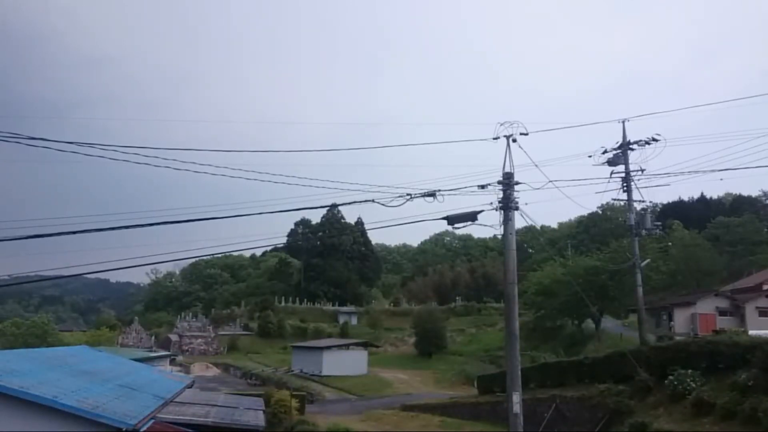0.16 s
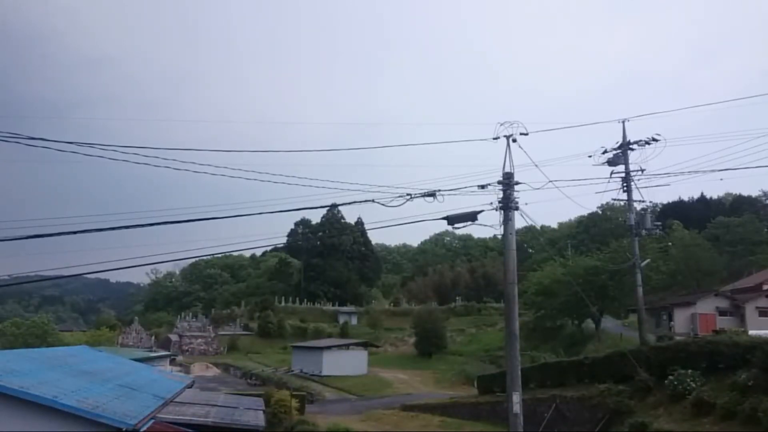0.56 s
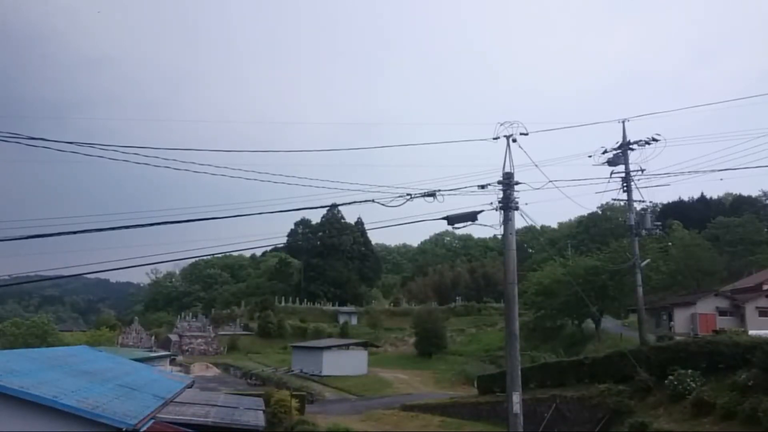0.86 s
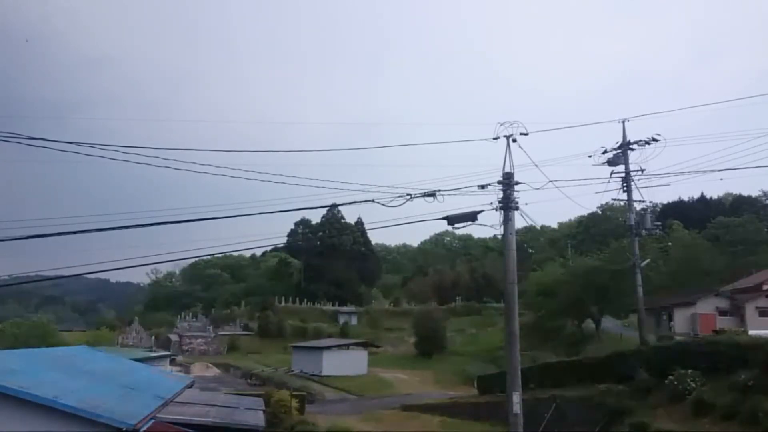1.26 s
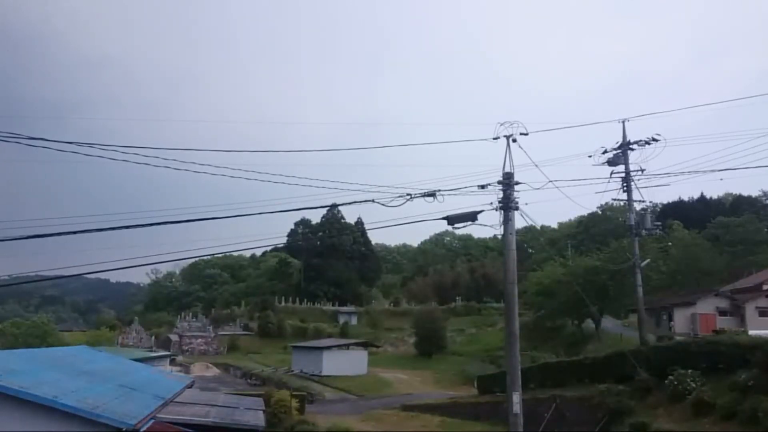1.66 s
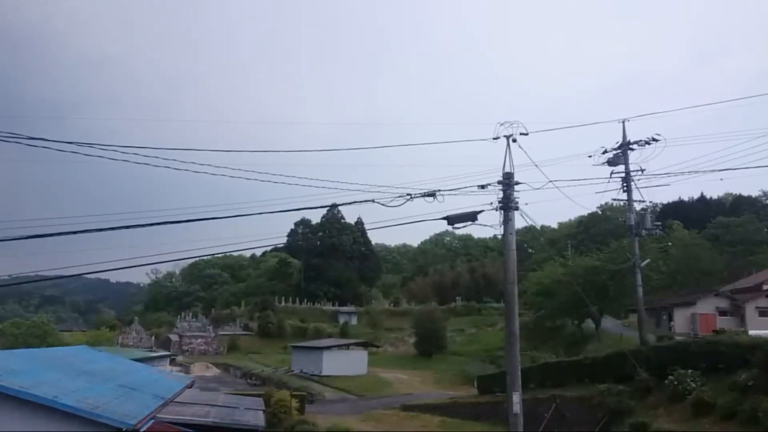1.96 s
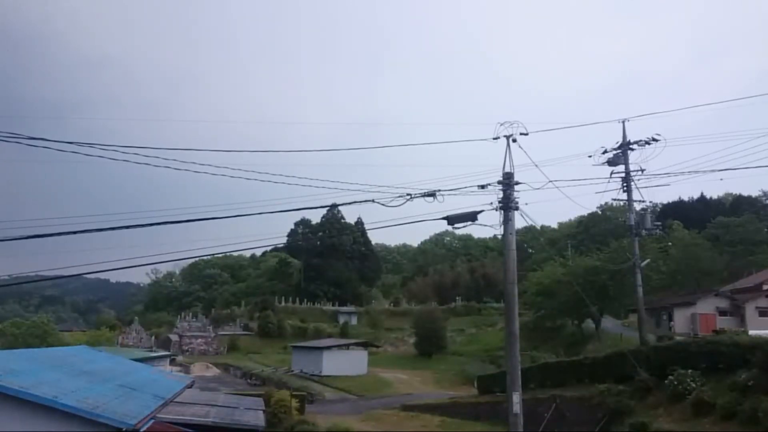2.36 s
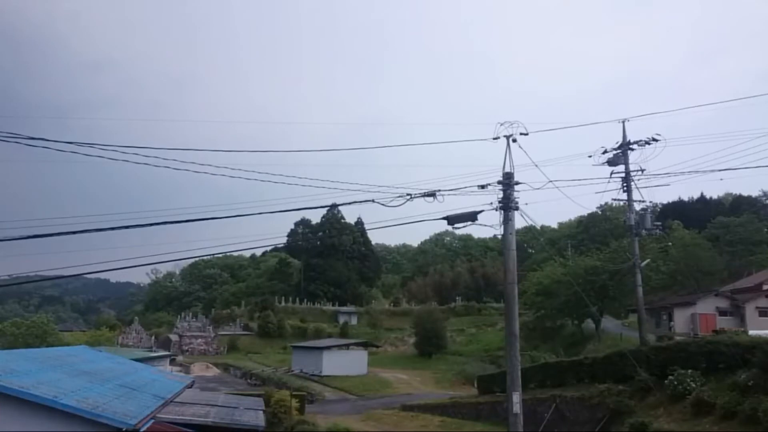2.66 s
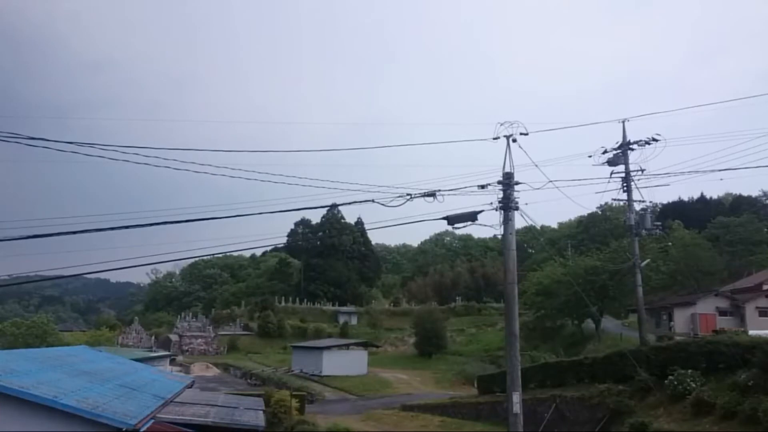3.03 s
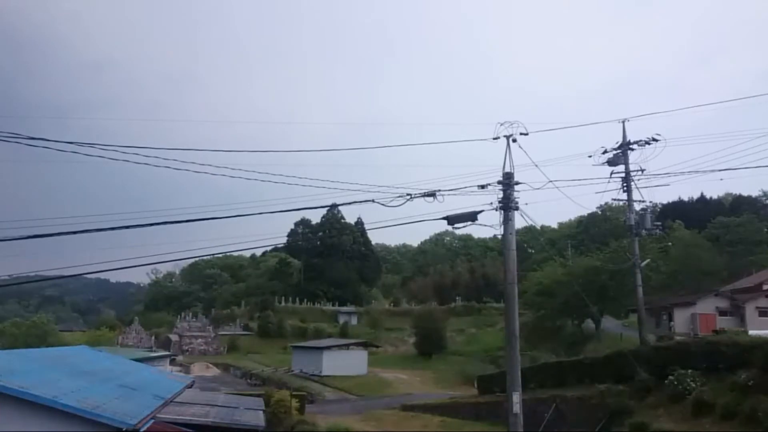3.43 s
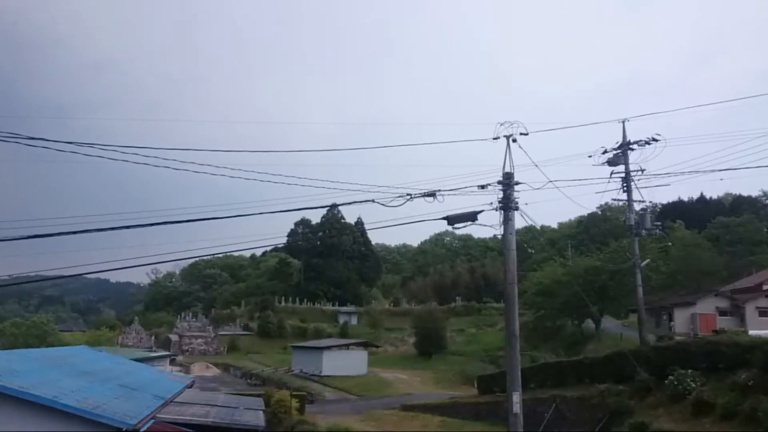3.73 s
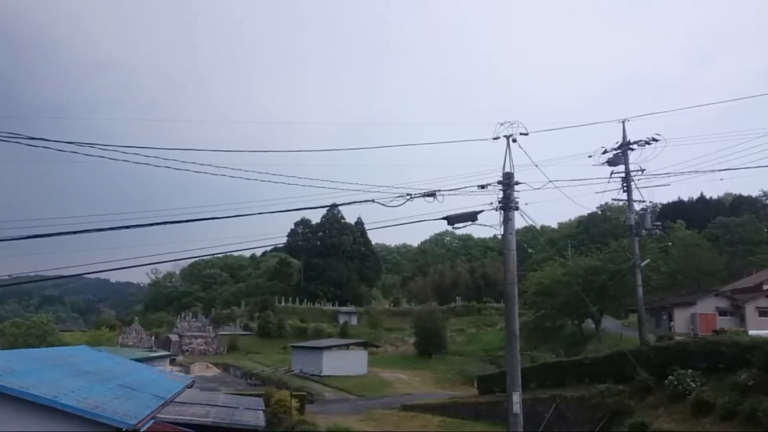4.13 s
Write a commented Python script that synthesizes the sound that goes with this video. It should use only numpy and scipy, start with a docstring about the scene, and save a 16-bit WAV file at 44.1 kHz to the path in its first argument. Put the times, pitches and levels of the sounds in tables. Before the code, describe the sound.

A loud clap of distant dry thunder rolls on in a low, uneven rumble over a quiet village, with faint knocks nearby.

```python
"""Dry thunder kilometres off, over a quiet village; one microphone stands just in front of a house wall.
Every kink of the lightning channel sends an N-shaped pressure wave: the big ones arrive as claps,
thousands of small ones as the roll, all dulled by the air, and the hills echo the claps.
Three loud claps carry a short overload click. Close to the microphone, something like a window screen
slides softly in its runner and knocks a few times. Behind it all lies the faint hush of country air."""
import sys
import numpy as np
from scipy import signal
from scipy.fft import rfft, irfft, next_fast_len
from scipy.io import wavfile
from scipy.ndimage import uniform_filter1d, minimum_filter1d

SR = 44100
rng = np.random.default_rng(int(sys.argv[2]) if len(sys.argv) > 2 else 0)


def bounce(signal):
    """Save signal as a 16-bit WAV file at the path given by the first command-line argument."""
    frames = np.transpose(np.atleast_2d(signal))
    limited = np.clip(frames, -1, 1)
    pcm = np.round(limited * 32767).astype(np.int16)
    wavfile.write(sys.argv[1], SR, pcm)


N = 189365
TIME = np.arange(N) / SR

# The big pressure waves. Each row: start in seconds, relative peak in dB, pitch of the wave in Hz,
# frequency in Hz above which the air has dulled it, seconds for which its surge holds.
CLAPS = [(0.359,0.5,197.5,627,0.019), (0.390,-3.5,442,602,0.0087), (0.457,-10,90.7,530,0.012),
         (0.473,-9.5,167,700,0.008), (0.517,-10,111,440,0.013), (0.540,-11.5,433,700,0.019),
         (0.678,-10.5,185,520,0.0061), (0.793,-10.5,170,637,0.0053), (0.819,-5.5,144,250,0.02),
         (0.851,-10.5,174,560,0.025), (0.931,-15,136,680,0.012), (0.982,-19.5,374,740,0.039),
         (1.078,-21,398,800,0.033), (1.323,-14,126,360,0.01), (1.351,-10.5,194,540,0.036),
         (1.46,-20.5,151,355,0.032), (1.531,-1.5,208,630,0.02), (1.6,-6.5,213,590,0.026),
         (1.647,-9.5,129,503,0.02), (1.745,-8,83.3,680,0.019), (1.817,-13,237,480,0.079),
         (1.899,-5.5,187,620,0.015), (1.925,-7.5,130,520,0.0063), (2.009,-5.5,91.4,620,0.0073),
         (2.068,-16,109,549,0.012), (2.11,-9.5,156,500,0.0063), (2.194,-13.5,195,330,0.005),
         (2.347,-6.5,91,150,0.034), (2.606,-20,262,450,0.01), (2.663,-14,104.3,400,0.034),
         (2.77,-17,175,320,0.03), (2.867,-11,79.7,380,0.011), (2.991,-15,134,436,0.013),
         (3.118,-8,85.4,400,0.034), (3.255,-16,264,630,0.014), (3.418,-23.5,101,230,0.01),
         (3.518,-26.5,80,220,0.0055), (3.777,-7.5,154,420,0.026), (3.807,-12.5,116,470,0.02),
         (3.845,-16,74,190,0.058), (3.907,-13,190,402,0.039), (3.924,-7.5,198,430,0.016),
         (3.981,-13.5,137,384,0.074), (4.059,-18.5,84,300,0.031)]
# The steady roll under the claps. Each row: time in seconds, level in dB.
ROLL_LEVEL = [(0.27, -47), (0.335, -24.5), (0.42, -21.5), (0.62, -30), (0.9, -31.5), (1.27, -31),
              (1.5, -28), (1.6, -21), (1.95, -15.5), (2.2, -24.5), (2.55, -29.5), (2.85, -28.5),
              (3.2, -25.5), (3.4, -40), (3.72, -41.5), (3.95, -25.5), (4.29, -43)]


def claps(gain_db=-0.5, scatter_db=-19, scatter_t60_s=0.25, size=8192):
    """Each far clap is one big N-wave, trailed by its scatter from the village roofs and ground."""
    out = np.zeros(N)
    scatter_decay = from_db(scatter_db - 60 * TIME[:size] / scatter_t60_s)
    for s, peak_db, hz, dull_hz, _ in CLAPS:
        paths = arrivals(per_s=500, spread_db=2.0, size=size) * rng.choice([-1, 1], size) * scatter_decay
        paths[0] = 1   # the direct path
        scattered = signal.fftconvolve(paths, n_wave(hz))[:size]
        clap = low_pass(travelled(scattered), dull_hz)
        add(out, s, from_db(peak_db + gain_db) * clap / np.abs(clap).max())
    return out


def n_wave(hz):
    """Pressure from one kink: a jump up, a straight fall and a jump back; its spectrum peaks near hz."""
    return np.linspace(1, -1, max(int(2 / 3 * SR / hz), 4))


def roll(rumble_db=-12, rumble_hz=58, boom_hz=110, grit_hz=350, onset_s=0.0187):
    """A hail of small N-waves of many lengths; far parts of the channel boom, nearer ones keep grit."""
    waves = np.zeros(N)
    for hz in np.geomspace(75, 230, 6):
        waves += signal.fftconvolve(arrivals(per_s=240, spread_db=2.5, size=N), n_wave(hz))[:N]
    waves = travelled(waves)
    rumble = low_pass(waves, rumble_hz, order=6)
    boom = high_pass(low_pass(waves, boom_hz, order=4), rumble_hz, order=6)
    body = high_pass(low_pass(waves, grit_hz, order=4), boom_hz, order=4)
    grit = high_pass(waves, grit_hz, order=4)
    level_db, = in_time(ROLL_LEVEL)
    boom_gain, body_gain, grit_gain = roll_gains()
    bands = (from_db(rumble_db + level_db) * evened(rumble, span_s=0.2)
             + boom_gain * evened(boom, span_s=0.08)
             + body_gain * evened(body, span_s=0.08)
             + grit_gain * evened(grit, span_s=0.04))
    # No roll until sound from the nearest part of the channel reaches the house.
    arrived = np.clip((TIME - ROLL_LEVEL[0][0]) / onset_s + 1, 0, 1)
    return arrived * bands


def roll_gains(surge_db=-10, typical_pitch_hz=124, typical_dull_hz=540):
    """Boom, body and grit of the roll: a steady part, plus a surge in the colour of each clap."""
    level_db, = in_time(ROLL_LEVEL)
    boom_db = level_db - 11 + 3.5 * TIME   # later sound comes from farther along the channel: deeper
    grit_db = -39 + 0.52 * (level_db + 30)   # grit follows about half of the roll's swing
    power = from_db([boom_db, level_db, grit_db]) ** 2
    for s, peak_db, hz, dull_hz, hold_s in CLAPS:
        octaves_deeper = np.log2(typical_pitch_hz / hz)
        octaves_brighter = np.log2(dull_hz / typical_dull_hz)
        colour_db = np.array([-2.5 + 10.5 * octaves_deeper, 0, -15.5 + 13.5 * octaves_brighter])
        power += np.outer(from_db(peak_db + surge_db + colour_db) ** 2, surge(s, hold_s) ** 2)
    return np.sqrt(power)


def surge(s, hold_s, attack_s=0.0071, release_s=0.029):
    """Envelope of the small waves that crowd in with a clap."""
    rise = np.clip((TIME - s) / attack_s + 1, 0, 1)
    return rise * np.exp(-np.clip((TIME - s - hold_s) / release_s, 0, 20))


def overload_clicks(length_s=0.0096):
    """Short clicks as the recorder overloads, placed on three of the loudest claps."""
    # Each row: time in seconds, level in dB, frequency in Hz above which the click is dull.
    clicks = [(0.364, -40, 12000), (1.533, -42.5, 2100), (1.912, -44.5, 2110)]
    # Spectrum of a click. Each row: frequency in Hz, relative level in dB.
    click_colour = [(400, -3.5), (900, 5.5), (1500, 1), (2700, -7), (3500, -17.5), (4300, -18.5),
                    (5200, -25.5), (6100, -12), (7000, -38.5), (14000, -42)]
    click_noise = noise(click_colour)
    return sum(low_pass(from_db(level_db) * swell(s, length_s) * click_noise, dull_hz, order=3)
               for s, level_db, dull_hz in clicks)


def travelled(waves, air_hz=3200, wall_delay_s=0.00408, wall_gain=0.075):
    """Kilometres of air take the treble; the wall behind the microphone adds one quick reflection."""
    # What air and ground leave of a pressure wave. Each row: frequency in Hz, gain in dB.
    path_colour = [(30, -22.5), (44, -13.5), (56, -22.5), (78, 1.5), (125, 2.5), (240, -1), (320, -6.5),
                   (420, -10), (610, -15.5), (900, -17.5), (1100, -25.5), (1400, -36.5), (2000, -39),
                   (3000, -55)]
    heard = low_pass(coloured(waves, path_colour), air_hz)
    t = TIME[:len(heard)]
    return heard + wall_gain * np.interp(t - wall_delay_s, t, heard, left=0)


def hills(x, echo_db, count=8):
    """The direct sound and a few dull echoes from the wooded slopes."""
    out, dull = x.copy(), low_pass(x, hz=505)
    for delay_s in rng.uniform(0.04, 0.35, count):
        add(out, delay_s, from_db(echo_db) * dull)
    return out


def slide_and_bursts(fade_s=0.08):
    """A soft rub and a thin hiss: three short bursts, then friction in the nearby screen's runner."""
    # Each row: centre in seconds, length in seconds, rub in dB, hiss in dB. The middle burst is
    # the treble edge of the thunderclap at 0.85 s; the other two are pushes of the screen.
    bursts = [(0.682, 0.15, -74.5, -70), (0.842, 0.18, -63, -79), (1.073, 0.2, -76, -70.5)]
    # One long slide. Each row: time in seconds, rub in dB, hiss in dB.
    long_slide = [(1.23, -84, -74), (1.328, -70.5, -67.5), (1.45, -72, -67.5), (1.53, -65.5, -64.5),
                  (1.8, -66.5, -67.5), (2.05, -67, -73.5), (2.249, -68, -71.5), (2.65, -70.5, -77),
                  (2.82, -68.5, -68.5)]
    # Spectra of the rub and the hiss. Each row: frequency in Hz, relative level in dB.
    rub_colour = [(900, -27), (1700, 5), (2200, -0.5), (2650, -1.5), (3100, -4.5), (3600, -6),
                  (5000, -13.5), (8000, -18), (14000, -46.5)]
    hiss_colour = [(3000, -25), (5000, -3), (6300, 3.5), (7700, 2), (8800, -1.5), (9800, -13), (12000, -18),
                   (15500, -24)]
    inside_s = np.minimum(TIME - long_slide[0][0], long_slide[-1][0] - TIME)
    moving = np.clip(inside_s / fade_s + 1, 0, 1)
    swells = sum(np.outer(from_db(levels_db), swell(s, length_s)) for s, length_s, *levels_db in bursts)
    rub_gain, hiss_gain = moving * from_db(in_time(long_slide)) + swells
    return rub_gain * noise(rub_colour) + hiss_gain * noise(hiss_colour)


def rasps_and_squeaks():
    """Slow noise spreads each whistle into an unsteady band: wide ones rasp, narrow ones squeak."""
    # Each row: centre in seconds, pitch in Hz, half width in Hz, level in dB, length in seconds.
    # The rasp near 2 kHz is the treble edge of the thunderclap at 0.85 s;
    # the rest are stick and slip in the screen's runner.
    bands = [(0.662, 2925, 800, -62, .09), (0.848, 2000, 616, -67, 0.085), (2.001, 2694, 58.8, -75, 0.39),
             (2.52, 2620, 59.6, -73.5, 0.19), (2.504, 6800, 170, -62.5, 0.019),
             (2.547, 7500, 200, -73, 0.035), (2.633, 7840, 252, -75, 0.14), (2.75, 7750, 202, -71, 0.045)]
    out = np.zeros(N)
    for s, hz, half_width_hz, level_db, length_s in bands:
        waver = rms_one(low_pass(rng.standard_normal(N), half_width_hz, order=3))
        whistle = np.sqrt(2) * np.sin(2 * np.pi * hz * TIME)
        out += from_db(level_db) * swell(s, length_s) * waver * whistle
    return out


def knocks(attack_s=0.0005, broad_db=-9, resonance_q=3.9):
    """Each contact rattles the screen's whole frame and favours one region of its dense resonances."""
    # Each row: start in seconds, level in dB, seconds to fall by 60 dB, favoured frequency in Hz.
    contacts = [(2.824, -52, 0.12, 6430), (2.832, -47.5, 0.22, 2710), (2.902, -65, 0.11, 6600),
                (3.389, -61, 0.084, 4170), (3.484, -66, 0.18, 7500), (3.783, -42.5, 0.26, 2340),
                (3.846, -47.5, 0.089, 6480), (3.847, -44.5, 0.17, 2710), (3.954, -51.5, 0.0226, 6100),
                (4.031, -58, 0.073, 2200)]
    # Spectrum of the frame. Each row: frequency in Hz, relative level in dB.
    frame_colour = [(500, 7), (1300, -1), (1700, 0), (2350, -3), (2950, -7), (3700, -5.5), (5000, -9),
                    (6400, -10), (7300, -15), (9000, -14), (10000, -26.5), (12000, -32.5), (15500, -48)]
    out, rattle = np.zeros(N), noise(frame_colour)
    for s, level_db, t60_s, hz in contacts:
        favoured = signal.lfilter(*signal.iirpeak(hz, resonance_q, fs=SR), rattle)
        ring = rms_one(favoured + from_db(broad_db) * rattle)
        age_s = np.maximum(TIME - s, 0)
        attack = 1 - np.exp(-age_s / attack_s)
        out += ring * attack * from_db(level_db - 60 * age_s / t60_s)
    return out


def air(start_db=-65.5, rise_db=3.0):
    """A faint hush all round the house that rises a little over the first second."""
    # Still country air. Each row: frequency in Hz, relative level in dB.
    hush_colour = [(25, -18.5), (70, 1.5), (140, -4.5), (260, -1), (400, -2), (860, -6), (1450, -14.5),
                   (2400, -13), (3900, -17.5), (6500, -25), (8500, -30), (10000, -40), (15500, -52.5)]
    return from_db(start_db + rise_db * np.minimum(TIME, 1)) * noise(hush_colour)


def from_db(db):
    """Decibels to gain."""
    return 10 ** (np.asarray(db) / 20)


def rms_one(x):
    """Scale to an rms of 1."""
    return x / np.sqrt(np.mean(x ** 2) + 1e-20)


def in_time(rows):
    """Each column of a curve, at every sample."""
    s, *columns = np.transpose(rows)
    return [np.interp(TIME, s, column) for column in columns]


def add(out, s, sound):
    """Mix a short sound in at time s."""
    start = max(int(s * SR), 0)
    out[start:start + len(sound)] += sound[:len(out) - start]


def swell(s, length_s):
    """A bell-shaped envelope around time s."""
    return np.exp(-np.minimum((2 * (TIME - s) / length_s) ** 2, 20))


def arrivals(per_s, spread_db, size):
    """Random impulses of uneven strength."""
    return (rng.random(size) < per_s / SR) * from_db(spread_db * rng.standard_normal(size))


def low_pass(x, hz, order=2):
    """Keep what lies below hz."""
    return signal.sosfilt(signal.butter(order, hz, fs=SR, output="sos"), x)


def high_pass(x, hz, order=2):
    """Keep what lies above hz."""
    return signal.sosfilt(signal.butter(order, hz, "high", fs=SR, output="sos"), x)


def coloured(x, spectrum):
    """Minimum-phase filter that follows rows of frequency in Hz and gain in dB."""
    size = next_fast_len(2 * len(x), real=True) * 2
    hz, db = np.transpose(spectrum)
    grid_hz = np.maximum(np.arange(size // 2 + 1) * SR / size, 1)
    gain = from_db(np.interp(np.log(grid_hz), np.log(hz), db))
    cepstrum = irfft(np.log(gain))
    cepstrum[1:size // 2] *= 2   # so nothing rings ahead of a wave
    cepstrum[size // 2 + 1:] = 0
    return irfft(rfft(x, size) * np.exp(rfft(cepstrum)))[:len(x)]


def noise(spectrum):
    """Noise of the given colour, rms 1."""
    return rms_one(coloured(rng.standard_normal(N), spectrum))


def evened(x, span_s):
    """Hold the running rms at 1, keeping the grain that is faster than the span."""
    window = np.hanning(max(int(span_s * SR), 8))
    power = signal.fftconvolve(x ** 2, window / window.sum(), "same")
    return x / np.sqrt(np.abs(power) + 1e-6 * np.mean(x ** 2))


def limited(x, ceiling=0.88, span_s=0.012):
    """A limiter turns the level down just around the highest peaks."""
    size = max(int(span_s * SR), 1)
    gain = minimum_filter1d(ceiling / np.maximum(np.abs(x), ceiling), 2 * size)
    return x * uniform_filter1d(uniform_filter1d(gain, size), size)


def scene():
    """Thunder far off, the screen close by and the hush behind them, in mono."""
    thunder = hills(claps(), echo_db=-19.5) + roll()
    small_sounds = overload_clicks() + slide_and_bursts() + rasps_and_squeaks() + knocks()
    return (thunder + small_sounds + air())[None]


def record(dry):
    """The microphone drops the deepest bass; peaks are limited and the top is cut."""
    microphone = high_pass(dry, hz=40.7, order=6)
    top_hz = 15700
    top_cut = signal.ellip(10, 0.2, 80, top_hz, fs=SR, output="sos")
    return signal.sosfilt(top_cut, limited(microphone))


dry = scene()
out = record(dry)
bounce(out)
```